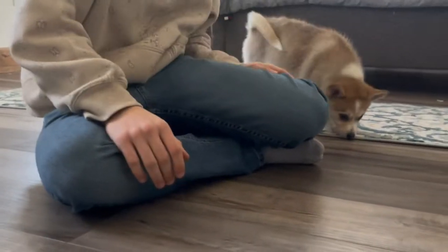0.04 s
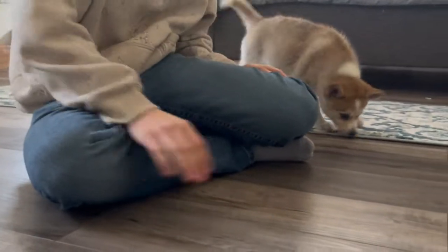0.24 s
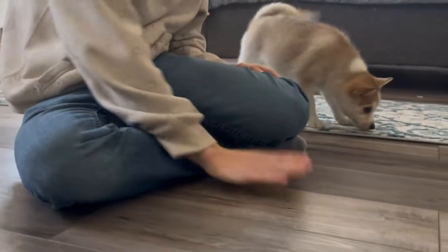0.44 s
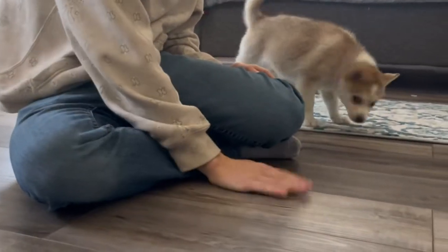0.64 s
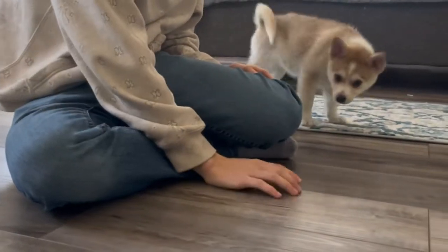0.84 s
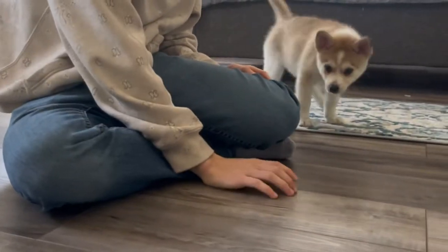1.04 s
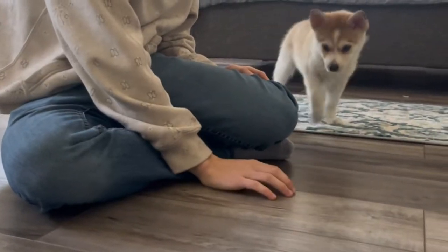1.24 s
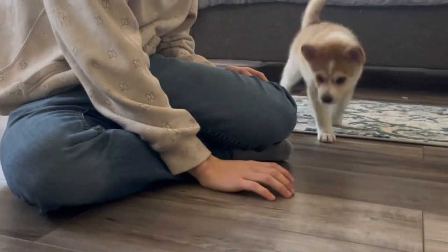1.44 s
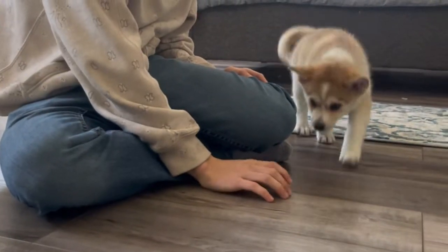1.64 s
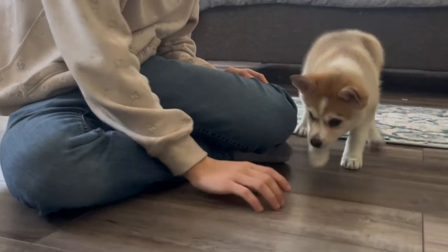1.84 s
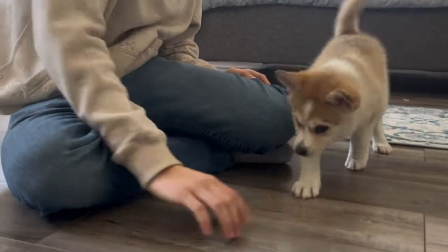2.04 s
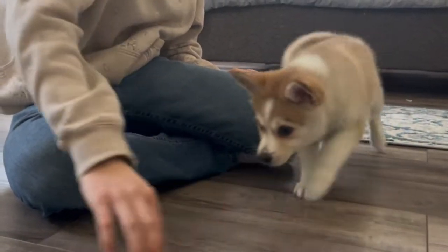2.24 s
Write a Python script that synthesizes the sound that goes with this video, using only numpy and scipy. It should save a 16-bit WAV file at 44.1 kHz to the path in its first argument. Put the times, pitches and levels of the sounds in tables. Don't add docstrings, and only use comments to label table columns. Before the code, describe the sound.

A hand slaps a hollow wooden floor, then a puppy's paws and claws patter closer indoors.

```python
import sys
import numpy as np
from scipy import signal
from scipy.fft import rfft, irfft, next_fast_len
from scipy.io import wavfile
from scipy.ndimage import uniform_filter1d

SR = 44100
rng = np.random.default_rng(int(sys.argv[2]) if len(sys.argv) > 2 else 0)


def attenuation_scalar(level_db):
    decades = np.asarray(level_db, float) / 20
    return 10 ** decades


def pcm_store(signal):
    levels = np.round(np.clip(np.atleast_2d(signal), -1, 1) * 32767)
    wavfile.write(sys.argv[1], SR, levels.astype(np.int16).T)


N = 100768

# start in seconds, level in dB, hardness in dB per octave, deep boom in dB.
BLOWS = [(0.269, -59.5, 7, 15.5), (.519, -26.5, 7, 6), (0.699, -25, -11.5, 2), (.735, -41, 8.5, 7),
         (0.866, -43, -14, 7), (0.946, -40, -29, 3), (1.071, -34, -13, 5.5), (1.145, -44, -0.5, 9),
         (1.409, -46.5, 4.5, -20), (1.521, -34.5, -9, 0.5), (1.557, -43.5, 2.5, 2), (1.592, -45.5, 9.5, -6),
         (1.606, -59, 15, -8), (1.625, -29.5, 4, 1.5), (1.659, -39, 3.5, 2), (1.686, -58.5, 0, 6),
         (1.7, -46.5, 6.5, 8), (1.74, -34, -8, 2), (1.773, -47.5, 1, 1), (1.855, -41.5, -26, 4),
         (1.906, -47, 13, -1), (1.914, -47.5, -12, 13), (1.951, -34, -6.5, 0), (1.986, -43.5, 4, 10.5),
         (2.013, -39.5, 8, 4), (2.03, -44, 9.5, 7), (2.057, -46.5, 8.5, -24), (2.119, -38.5, -25, 6.5),
         (2.168, -41.5, 3.5, 8), (2.192, -36.5, 1, 2), (2.205, -50.5, -3, 2), (2.24, -46, -12, 9),
         (2.269, -59, 19, -13)]
# pitch in Hz, level in dB, 60 dB decay in seconds.
BOARD_MODES = [(72.74, 3, 0.2), (95.9, -10, 0.3), (115.2, -16.5, 0.34), (158.2, -10.5, 0.24),
               (167.5, 6, 0.092), (206.8, -7.5, 0.14), (252.6, -4, 0.097), (357.7, -15, 0.038),
               (463, -37, 0.093), (626, -35.5, 0.064)]
# pitch in Hz, level in dB, 60 dB decay in seconds.
PALM_MODES = [(196.4, -22, 0.19), (250, -28, 0.26), (345, -26, 0.05), (361, -37, .2), (445, -43, .2),
              (565, -46, 0.22), (600, -42, 0.22), (651, -51, .2), (785, -52, .2), (990, -51, 0.22),
              (1217, -52, .15), (1583, -38, 0.017), (1700, -54, .12)]
# frequency in Hz, level in dB per Hz.
THUD_SPECTRUM = [(250, -19.5), (450, 8), (650, 7), (1000, -8), (1700, -17), (2600, -39.5)]
# start in seconds, peak in dB, lowest pitch in Hz, length in ms, nail resonance in Hz.
TICKS = np.array([(.516, -54, 3030, 6.1, 8980), (.5197, -31.5, 524, 15.5, 1480),
         (.5305, -49.5, 850, 16, 5860), (.697, -57, 2460, 3.8, 9720), (.7005, -47.5, 2480, 1.9, 9700),
         (.7035, -39.5, 850, 2.1, 1430), (.704, -42, 1500, 3.8, 2350), (.8639, -58, 493, 9.9, 4220),
         (.875, -86, 5000, 3.4, 9400), (.9477, -54.5, 493, 5.4, 3680), (1.0705, -56, 900, 11, 4220),
         (1.1443, -62.5, 700, 7.2, 3480), (1.4117, -61, 920, 9, 7470), (1.5214, -53, 830, 8.1, 3620),
         (1.6237, -60, 806, 9.7, 4130), (1.702, -69, 6700, 140, 8140), (1.7195, -64, 895, 4, 2530),
         (1.7399, -56, 816, 11, 1620), (1.7625, -46.5, 5800, 8.6, 7550), (1.7703, -40, 5500, 14.4, 8060),
         (1.776, -59, 800, 12, 2380), (1.789, -58.5, 840, 5.4, 1860), (1.793, -57.5, 4760, 78, 8000),
         (1.9295, -51, 6600, 14, 8300), (1.944, -51, 790, 4.8, 1920), (2.0138, -34.5, 1620, 3.53, 6250),
         (2.035, -46, 4600, 3.2, 11440), (2.058, -39.5, 4570, 27, 10600), (2.1355, -44.5, 4900, 8.1, 8600),
         (2.2578, -42, 5940, 8.1, 8000), (2.271, -42, 5660, 8.4, 8060)])
SHARED_TICK_HZ = (1250, 6150, 8800)
# start in seconds, peak in dB, pitch in Hz, time to
# swell and die by some 120 dB in seconds.
KNOCKS = [(.052, -48, 266, 0.023), (.310, -47.5, 501, 0.068), (.5205, -28, 1010, 0.022),
          (.661, -47, 560, 0.02), (1.147, -62, 610, 0.024), (.905, -60, 1530, 0.0087),
          (1.412, -57.5, 527, 0.021), (1.413, -43, 243, 0.039), (.870, -62, 623, .04),
          (.951, -62, 640, 0.017), (1.075, -66, 642, 0.048), (1.526, -61, 620, 0.038),
          (1.628, -58.5, 605, 0.036), (1.743, -61.5, 610, 0.019), (1.592, -71.5, 730, 0.049),
          (1.606, -70, 715, 0.034), (1.652, -80, 870, .03), (1.692, -71, 1300, .03),
          (1.704, -71, 570, 0.016), (1.948, -53, 950, 0.018), (2.009, -47.5, 640, 0.042),
          (2.0295, -46, 670, 0.027), (2.061, -51.5, 3390, 0.051), (2.063, -48.5, 1006, 0.042),
          (2.069, -52.5, 5460, 0.055), (2.118, -52.5, 626, 0.022), (2.082, -58, 1030, 0.025),
          (2.194, -57, 610, 0.022), (2.270, -57, 650, 0.02)]
# time in seconds, level in dB, dull share in dB.
MOTION = [(0, -66, 5.5), (.08, -65.5, -0.5), (0.188, -75.5, 4), (0.239, -59, 7), (.30, -60.5, 10),
          (.40, -65.5, 6.5), (0.514, -66, 12.5), (.58, -101, 19), (1.54, -99, -13), (1.601, -90, 21),
          (1.75, -76, -2), (1.88, -71.5, 10), (1.96, -66.5, 10), (2.07, -59, 4), (2.15, -59.5, 2.5),
          (2.22, -62.5, 3.5), (2.249, -65.5, 5), (2.285, -59.5, 2)]
# frequency in Hz, level in dB per Hz.
BRIGHT_RUSTLE = [(800, -48), (2000, 1), (4000, -1.5), (6000, -3.5), (8500, -4.5), (12000, -1), (13300, -58)]
# frequency in Hz, level in dB per Hz.
DULL_RUSTLE = [(150, 10.5), (400, 7), (1000, 8.5), (1600, 10), (2500, -17), (5000, -53)]
# frequency in Hz, 60 dB decay in seconds.
ROOM_DECAY = [(100, 0.58), (500, 0.31), (2000, 0.37), (10000, 0.27)]
# frequency in Hz, level in dB.
ROOM_COLOUR = [(60, -13), (150, -2), (500, 15.5), (1800, -2), (8000, -2)]
# frequency in Hz, level in dB per Hz.
HUSH_SPECTRUM = [(33, -17), (45, 0), (65, -5), (90, -7.5), (125, -19), (160, -21.5), (400, -40.5),
                 (1000, -49.5), (9000, -61.5), (12500, -58)]
# pitch in Hz, level in dB.
HUM = [(59.5, -66.5), (118, -64.5)]
# frequency in Hz, likeness from 0 to 1.
ALIKE = [(60, .99), (600, .5), (1300, .4), (6000, .75), (9000, .93)]
# frequency in Hz, lead of the left in radians.
PORT_PHASE = [(300, 0), (1200, .25), (1900, -.7), (3000, 1.0), (4600, .3), (7670, 1.0), (8900, -.5),
              (10300, -3.1), (11700, -6.1), (12800, -6.4)]
# frequency in Hz, left over right in dB.
PORT_DB = [(60, .6), (180, 1.8), (350, .5), (1400, 3.5), (3850, 2.8), (9000, .2)]
# frequency in Hz, gain in dB.
MICROPHONE = [(22, -22), (42, 0), (5000, 0), (9000, 4), (11500, 2), (13200, -26)]

PALM_S = .519
PIVOT_HZ = 164


def boards():
    common, differing = np.zeros((2, N + SR))
    hz, ring = rings(BOARD_MODES)
    octaves_up = np.log2(np.maximum(hz / PIVOT_HZ, 1))
    chance = rng.standard_normal((len(BLOWS), 2, len(BOARD_MODES), 1))
    for (s, db, hard, deep), (level_luck, side_luck) in zip(BLOWS, chance):
        tilt = np.where(hz < .7 * PIVOT_HZ, deep, hard * octaves_up)
        modes = ring * attenuation_scalar(db + tilt + level_luck)
        add(common, s, modes.sum(axis=0))
        add(differing, s, (modes * unevenness(hz, side_luck)).sum(axis=0))

    palm_hz, palm = rings(PALM_MODES)
    side = np.sqrt(palm_hz / 130 / 2) * rng.choice([-1, 1], palm_hz.shape)
    add(common, PALM_S, palm.sum(axis=0))
    add(differing, PALM_S, (palm * unevenness(palm_hz, side)).sum(axis=0))
    quarter_cycle = lambda f: 1j * (f > 0)
    return common[:N], filtered(differing[:N], quarter_cycle)


def rings(modes):
    hz, level, t60 = np.transpose(modes)[:, :, None]
    travel_s = .0054 * (PIVOT_HZ / hz) ** .7
    t = np.maximum(np.arange(SR // 2) / SR - travel_s, 0)
    swell = 1 - np.exp(-t * hz / .7)
    return hz, -np.sin(2 * np.pi * hz * t) * attenuation_scalar(level - 60 * t / t60) * swell


def unevenness(hz, side):
    return .4 * side / (1 + (130 / hz) ** 4)


def thud():
    t = np.maximum(np.arange(N) / SR - PALM_S, 0)
    envelope = attenuation_scalar(-30.5 - 60 * t / .208) * (1 - np.exp(-t / .006))
    return envelope * rush(THUD_SPECTRUM, patchy_db=8.5)


def ticks():
    close, spread = np.zeros((2, N + SR))
    t = np.arange(SR // 8) / SR
    click = 1. * (t == 0)
    for (s, db, hz, ms, nail), noise in zip(TICKS, rng.standard_normal((len(TICKS), len(t)))):
        t_ms = t * 1000
        burst = noise * attenuation_scalar(-30 * t_ms / ms) * (1 - np.exp(-t_ms / (0.048 * ms)))

        def edge(f):
            return (-f * f / (hz * hz - f * f + 1j * f * hz)) ** 2 * (hz / (hz + 1j * f)) ** .4

        def nail_tone(f):
            shared = sum(peak(f, c, 10) for c in SHARED_TICK_HZ)
            return edge(f) * (1 + attenuation_scalar(10) * (peak(f, nail, 10) + attenuation_scalar(-7) * shared))

        tick = filtered(burst, nail_tone)
        tick = attenuation_scalar(db + 1.5) * tick / np.abs(tick).max()
        add(close, s, tick)
        add(spread, s, unit(filtered(click, edge)) * np.sqrt(np.mean(tick ** 2)))
    return close[:N], spread[:N]


def peak(f, hz, q):
    return 1j * f * hz / q / (hz * hz - f * f + 1j * f * hz / q)


def knocks():
    out, t = np.zeros(N + SR), np.arange(SR // 5) / SR
    for s, db, hz, t60 in KNOCKS:
        u = t / (0.097 * t60)
        swell = u ** 2 * np.exp(2 - 2 * u)
        add(out, s, attenuation_scalar(db) * np.sin(2 * np.pi * hz * t) * swell)
    return out[:N]


def rustle():
    s, level_db, dull_db = np.transpose(MOTION)
    now = np.arange(N) / SR
    bright = rush(BRIGHT_RUSTLE, patchy_db=2.0)
    dull = attenuation_scalar(np.interp(now, s, dull_db) - 9) * rush(DULL_RUSTLE, patchy_db=1.5)
    return attenuation_scalar(np.interp(now, s, level_db)) * (bright + dull)


def room(x, size=SR // 8):
    out = np.zeros((2, N + 2 * SR))
    fade = signal.get_window("hann", 2 * size)
    x = np.pad(x, (size, 2 * size))
    for start in range(0, N + size, size):
        hz, t, z = signal.stft(rng.standard_normal((2, SR // 2)), SR, nperseg=256)
        decay = attenuation_scalar(-60 * t / along(ROOM_DECAY, hz)[:, None])
        tail = diffuse(signal.istft(z * decay, SR, nperseg=256)[1], ROOM_COLOUR)
        piece = fade * x[start:start + 2 * size]
        wet = signal.fftconvolve(piece[None], tail / np.linalg.norm(tail[0]), axes=1)
        out[:, start + round(.006 * SR):][:, :wet.shape[1]] += wet
    return out[:, size:N + size]


def hush():
    now = np.arange(N) / SR
    hum = sum(attenuation_scalar(db + 7.0) * np.sin(2 * np.pi * hz * now) for hz, db in HUM)
    return attenuation_scalar(-55.5) * rush(HUSH_SPECTRUM, patchy_db=2.5) + hum


def rush(spectrum, patchy_db):
    z = signal.stft(rng.standard_normal((2, N + 512)), nperseg=256)[2]
    field = uniform_filter1d(rng.standard_normal(z.shape[1:]), size=8, axis=0)
    field = uniform_filter1d(field, size=3, axis=1)
    pair = signal.istft(z * attenuation_scalar(patchy_db * unit(field)), nperseg=256)[1][:, :N]
    return unit(diffuse(pair, [(1, -120)] + list(spectrum) + [(SR / 2, -120)]))


def diffuse(pair, spectrum):
    def mid_side(hz):
        turn = np.arccos(np.clip(along(ALIKE, hz), -1, 1)) / 2
        return attenuation_scalar(along(spectrum, hz)) * [np.cos(turn), np.sin(turn)]

    mid, side = filtered(pair, mid_side)
    return np.array([mid + side, mid - side])


def filtered(x, response):
    m = next_fast_len(x.shape[-1] + 8192)
    return irfft(rfft(x, m) * response(np.fft.rfftfreq(m, 1 / SR)), m)[..., :x.shape[-1]]


def along(points, hz):
    f, v = np.transpose(points)
    return np.interp(np.log(hz + 1), np.log(f + 1), v)


def unit(x):
    return x / np.sqrt(np.mean(x ** 2) + 1e-20)


def add(track, s, sound):
    track[round(s * SR):][:len(sound)] += sound


def scene():
    board, apart = boards()
    tick, tick_spread = ticks()
    knock = knocks()
    wet = room(attenuation_scalar(-10.5) * board + attenuation_scalar(-2) * tick_spread + attenuation_scalar(-13.5) * knock)
    return board + apart * [[1], [-1]] + tick + knock + thud() + wet + rustle() + hush()


def top_cut(x):
    return signal.sosfilt(signal.butter(12, 13230, fs=SR, output="sos"), x)


def record(dry):
    def response(hz):
        half = attenuation_scalar(along(PORT_DB, hz) / 2) * np.exp(.5j * along(PORT_PHASE, hz))
        return np.array([half, 1 / half]) * attenuation_scalar(along(MICROPHONE, hz)) * (hz < 13250)

    return top_cut(filtered(dry, response))


dry = scene()
out = record(dry)
pcm_store(out)
```